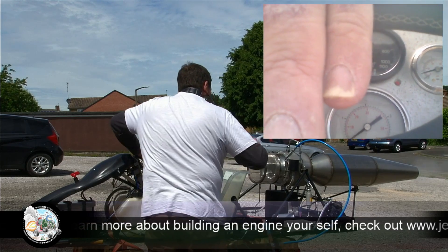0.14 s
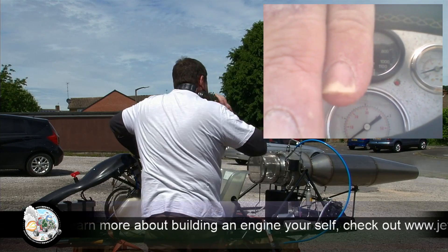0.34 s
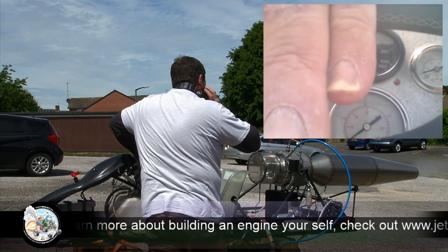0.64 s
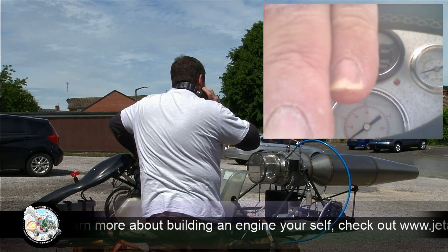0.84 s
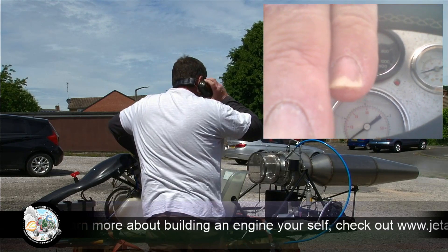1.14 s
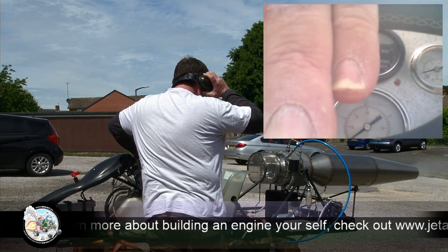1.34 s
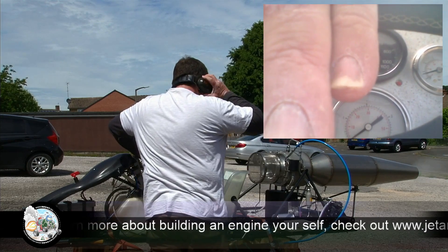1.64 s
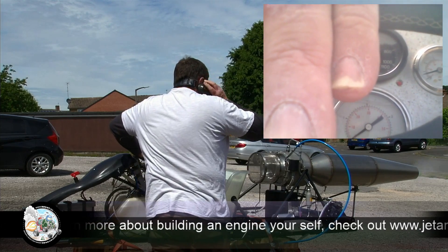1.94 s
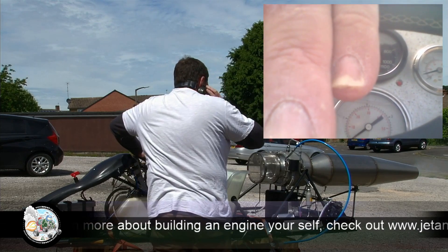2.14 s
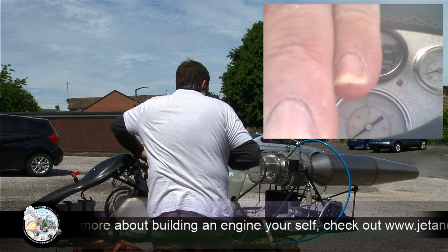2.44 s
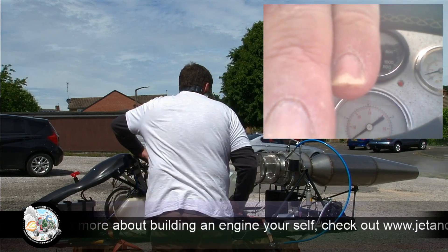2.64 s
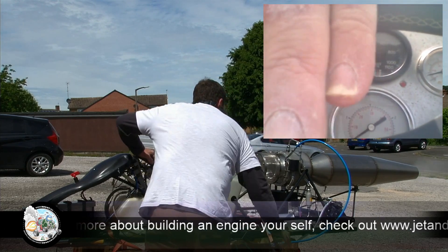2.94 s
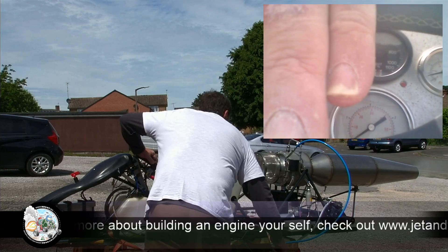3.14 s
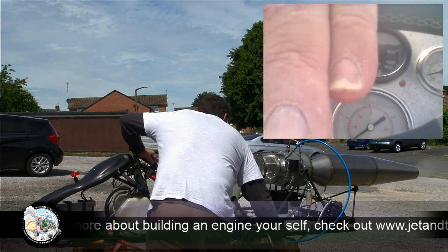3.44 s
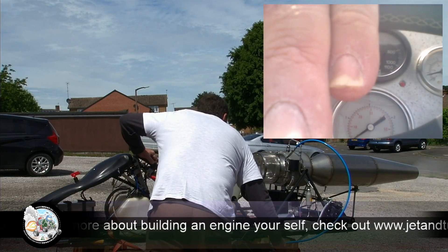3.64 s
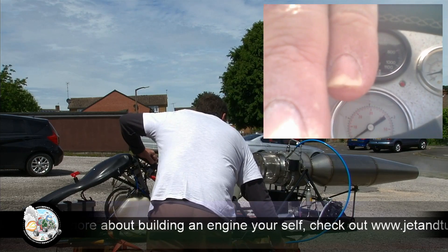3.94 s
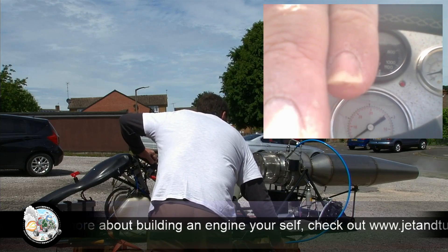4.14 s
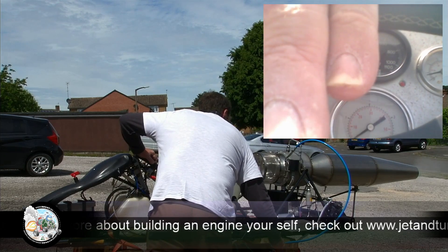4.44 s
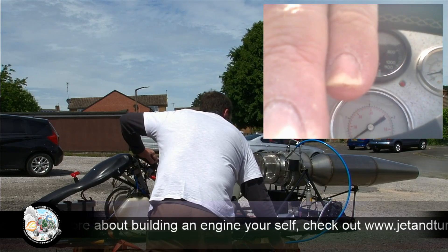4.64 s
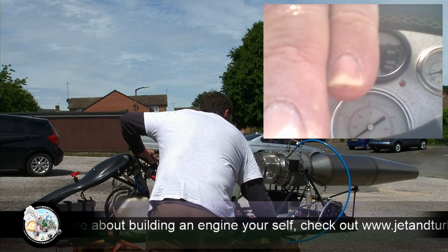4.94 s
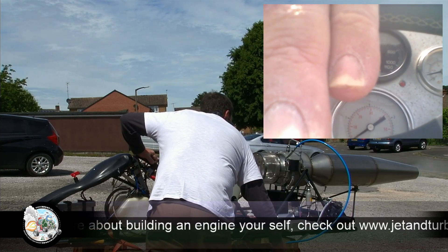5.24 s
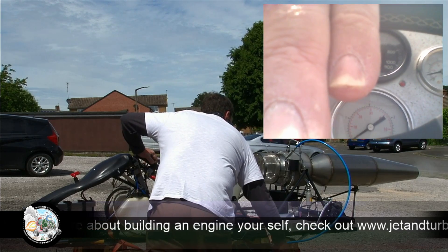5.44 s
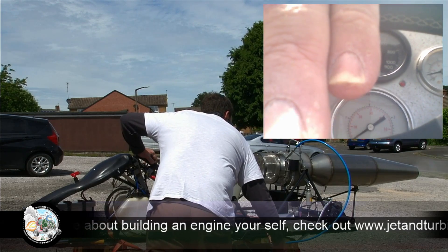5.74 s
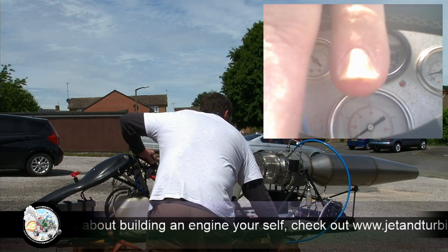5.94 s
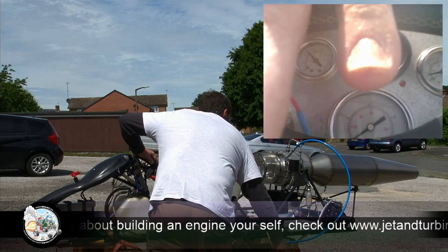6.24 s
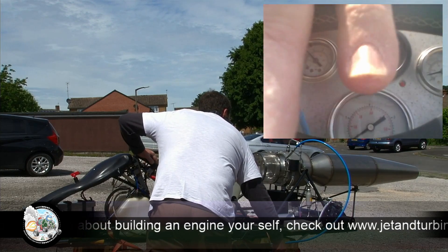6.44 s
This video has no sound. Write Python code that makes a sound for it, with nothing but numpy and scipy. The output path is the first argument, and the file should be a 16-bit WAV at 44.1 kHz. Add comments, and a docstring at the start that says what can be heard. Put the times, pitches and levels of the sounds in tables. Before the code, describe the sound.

In an open car park, a small gas turbine sings a loud, piercing whine that wavers and slowly sags, wrapped in duct roar and rushing air. Just after five seconds it dips quickly, the air is cut, and a thinner whine coasts down. Wind buffets the microphone softly; dry scuffs and a dull knock come close by near the end.

```python
"""A small gas turbine built from a turbocharger runs in an open car park, over gusty wind rumble and a far murmur.
Its blades whine in a stack of sine tones that sags slowly, over coloured noise for the roar and hiss of air.
After five seconds the drive is eased and the pitch drops; then the air is shut off, the hiss falls away
and the whine winds down under air drag. Near the end come dry noise-burst scuffs and a soft knock of two
decaying sines, close by."""
import sys
import numpy as np
from scipy import signal
from scipy.fft import rfft, irfft, next_fast_len
from scipy.io import wavfile
from scipy.ndimage import uniform_filter1d

SR = 44100
rng = np.random.default_rng(int(sys.argv[2]) if len(sys.argv) > 2 else 0)


def to_wav(s):
    """Save 16-bit WAV."""
    ch = np.atleast_2d(s).T  # columns
    pcm = np.round(np.clip(ch, -1, 1) * 32767)  # PCM
    wavfile.write(sys.argv[1], SR, pcm.astype(np.int16))


N = 291058   # length in samples

# Colour of the far murmur: (frequency [Hz], relative density [dB per Hz])
MURMUR_COLOUR = [(60, -14), (150, 2), (220, 1.5), (330, -14), (550, -8), (820, 4), (1100, -19), (1800, -10),
                 (3000, -25), (8000, -50)]
MURMUR_DB = -52.5

# Wind gusts: (time [s], lift [dB], width at half lift [s])
GUSTS = [(.3, 9.5, 0.35), (.6, 11.5, 0.3), (1.4, 9, 0.3), (2.15, 9.5, .2), (2.38, 10, 0.13), (2.8, 7, 0.23),
         (3.3, 11, 0.27), (3.58, 9, 0.089), (3.77, 12, 0.16), (4.2, 10, 0.54), (4.98, 13, .12),
         (5.7, 10.5, 0.59), (6.15, 3.5, .3)]
# Colour of the wind rumble: (frequency [Hz], relative density [dB per Hz])
WIND_COLOUR = [(12, -5.5), (25, 7.5), (50, -1), (80, -2), (130, -28), (250, -51)]
WIND_DB, WIND_SAG_DB_PER_S = -44, 1.55   # lull between gusts, at the start

# Dry scuffs: (time [s], level before the rise softens it [dB], rise time constant [s], decay by 60 dB [s])
SCUFFS = [(5.727, -41.5, .001, .07), (5.845, -48, .008, .2), (6.146, -56, .001, .03),
          (6.332, -51, .004, .18), (6.445, -47, .004, 0.15)]
# Colour of the scuffs: (frequency [Hz], relative density [dB per Hz])
SCUFF_COLOUR = [(3000, -22), (5500, 0), (8000, -3), (12000, -5), (15500, -13)]
# Ringing tones of the knock: (frequency [Hz], level before the rise softens it [dB], decay by 60 dB [s])
KNOCK_TONES = [(109.7, -37.5, .6), (268, -42, 0.54)]
KNOCK_S, KNOCK_RISE_S = 6.325, 0.0099   # start, rise time constant

# Air through the engine, one row each for combustor rumble, duct roar, intake rush and jet hiss:
# (starting level [dB], sag [dB/s], loss when eased [dB], loss when shut [dB], fading after the shut-off [dB/s])
AIR_LEVELS = [(-38, 1.0, 2, 2.5, 6), (-31, .5, 5.5, 0, 8), (-29.5, 1, 4, 2, 9), (-34.5, 0.36, 7.5, 20, 14)]
# Colours of the four airs: (frequency [Hz], relative density [dB per Hz])
RUMBLE_COLOUR = [(60, -7.5), (100, -1.5), (180, -3), (260, -3.5), (380, -4), (480, -17), (600, -54)]
ROAR_COLOUR = [(300, -35), (400, -7.5), (470, -6), (700, -9), (1100, -6.5), (1400, -9.5), (1700, -18.5),
               (2200, -50)]
RUSH_COLOUR = [(1100, -29), (1500, -8.5), (2000, -3.5), (2700, -5), (4000, -7.5), (5000, -11), (6200, -18),
               (7500, -23), (11000, -31), (16000, -52)]
HISS_COLOUR = [(3500, -17), (5000, 2), (6200, -3.5), (7500, 0.5), (9000, -1.5), (12000, -4), (15500, -10)]
# Duct resonances: (frequency [Hz], width at half lift [Hz], lift [dB])
DUCT_RESONANCES = [(131, 23, 8.5), (162.5, 12, 7.5), (221, 7.5, 2.5), (529, 124, 8), (798, 63, 7),
                   (997, 140, 5), (1288, 69, 6), (2140, 140, 3.5), (3530, 33, 5)]
# One swell of the rumble: (time [s], lift [dB], width at half lift [s])
RUMBLE_SWELL = (1.4, 3.5, 2.8)

# Rotor while driven: (time [s], blade passing rate [Hz])
DRIVEN_SPEED = [(0, 2579.4), (.4, 2573.7), (.8, 2560.3), (1.2, 2538.9), (2, 2489.4), (2.8, 2438.6),
                (3.2, 2411.7), (3.6, 2387.7), (4.2, 2352.6), (5, 2299.3), (5.08, 2284.8), (5.16, 2242.6),
                (5.24, 2183.1), (5.4, 2073.5), (5.48, 2018.0)]
# Air drag after the last driven point: the rate falls as (1 + age / COAST_S) ** -COAST_POWER
COAST_S, COAST_POWER = 3.856, 1.952
EASE_S, EASE_FALL_S, AIR_EASE_FALL_S = 5.06, 0.055, 0.13   # drive eased: start, time constants of tones and air
SHUT_S, SHUT_FALL_S = 5.475, 0.08   # air shut off: start, time constant

# The four lowest orders swell and fade as direct sound and echoes add or cancel:
# (time [s], rms level before losses, dropouts and flutter [dB])
FIRST_LEVEL = [(0, -15), (.3, -15), (.55, -19), (.68, -18), (.9, -19), (1.1, -14), (1.21, -14), (1.6, -11),
               (1.78, -11.5), (2.1, -9), (2.3, -10.5), (2.78, -10.5), (3.04, -16.5), (3.2, -14.5),
               (3.3, -14), (3.42, -11.5), (3.64, -16.5), (3.86, -17), (3.96, -16.5), (4.2, -17),
               (4.38, -21), (4.52, -28.5), (4.96, -22.5), (5.1, -16), (5.18, -22), (5.33, -23), (5.42, -25),
               (5.54, -24)]
SECOND_LEVEL = [(0, -20.5), (.4, -22), (.92, -15.5), (1.12, -20.5), (1.28, -19.4), (1.8, -27.7),
                (1.92, -23.5), (2.16, -34), (2.3, -37), (2.42, -28.5), (2.68, -29), (3.0, -19.5),
                (3.16, -24), (3.56, -19), (3.96, -24.5), (4.2, -21), (4.56, -18.5), (4.95, -28.5),
                (5.05, -24.5), (5.35, -21.5), (5.86, -23), (5.96, -27.5), (6.08, -23), (6.16, -27),
                (6.24, -25), (6.29, -17.5), (6.38, -23.5), (6.46, -29.5), (6.53, -38), (6.6, -33)]
THIRD_LEVEL = [(0.0, -36), (0.08, -37.0), (1.48, -27), (1.88, -35), (2.04, -32.3), (2.6, -39.5),
               (2.92, -30), (3.4, -38.5), (3.88, -27.5), (4.0, -36), (4.6, -31), (4.72, -39), (5.36, -30.5),
               (5.48, -39)]
FOURTH_LEVEL = [(0, -38), (.4, -39.5), (.76, -30.5), (1.3, -33.5), (1.55, -31.5), (1.85, -33.5),
                (2.3, -32.5), (2.75, -36.5), (2.92, -30.5), (3.92, -34.5), (4.08, -44), (4.5, -43),
                (4.84, -34.5), (5.05, -37.5), (5.3, -31), (5.45, -35.5), (6.08, -42.5), (6.2, -52),
                (6.45, -32), (6.6, -36)]
HIGH_ORDERS_DB = (-39, -40, -53)   # fifth, sixth and seventh, before the same changes and slow fading
# Faint tones from uneven blades: (time [s], rms level before losses, flutter and patchiness [dB])
FIVE_QUARTERS_LEVEL = [(0, -60), (.9, -42), (1.15, -38.5), (1.3, -70)]
ELEVEN_QUARTERS_LEVEL = [(0, -56), (2.7, -57), (2.92, -46), (3.1, -57), (3.5, -48), (3.75, -55),
                         (3.88, -49), (4.1, -60), (5.52, -58), (5.63, -45), (5.7, -58), (5.85, -53),
                         (6.1, -83)]
# Pitch of each tone: (multiple of the blade rate)
ORDERS = [1, 2, 3, 4, 5, 6, 7, 5 / 4, 11 / 4]
# Loss of each tone, negative for a lift: (loss when eased [dB], loss when shut [dB])
ORDER_LOSS = [(-1.5, 45), (0.5, 12), (1.5, 30), (0.5, 19), (7, 33), (6, 30), (4, 35), (1, -6), (0, -2)]
# Echoes cancel one order for a moment, most often while the pitch falls fast:
# (time [s], order, depth [dB], width at half depth [s])
DROPOUTS = [(.2, 6, 22, 0.22), (1.03, 5, 11, 0.15), (1.6, 5, 14, 0.25), (1.95, 6, 10, 0.48),
            (2.14, 2, 14, 0.027), (2.2, 5, 7, .15), (2.7, 2, 11, 0.048), (3.05, 6, 7, .3),
            (3.47, 6, 20, .06), (3.5, 5, 3, 0.25), (3.88, 2, 5, 0.042), (4.25, 3, 10, 0.064),
            (4.62, 6, 8, 0.18), (5.049, 3, 19, 0.011), (5.139, 1, 14, 0.029), (5.141, 3, 11, 0.0089),
            (5.206, 3, 21, .017), (5.211, 1, 8, .014), (5.213, 2, 14, 0.012), (5.287, 2, 11, .011),
            (5.322, 2, 10, 0.011), (5.29, 1, 5, 0.014), (5.332, 4, 9, 0.024), (5.396, 2, 12, 0.016),
            (5.396, 3, 19, .023), (5.456, 2, 13, 0.03), (5.5, 1, 15, 0.0099), (5.53, 2, 3, 0.023),
            (5.563, 2, 12, .01), (5.63, 2, 16, .01), (5.674, 2, 15, 0.052), (5.801, 2, 9, 0.017),
            (5.83, 4, 13, 0.021), (5.907, 2, 23, 0.014), (5.92, 4, 8, .02), (5.97, 2, 9, 0.016),
            (6.198, 2, 9, 0.011), (6.52, 4, 7.5, 0.018)]

# Stereo spread of all noise: (frequency [Hz], side level relative to mid [dB])
SIDE_SHARE = [(60, -64), (150, -26), (500, -32.5), (1200, -42), (2500, -52), (6000, -67), (9000, -20.5),
              (15000, -6)]
CUTOFF_HZ = 15750


def from_db(db):
    """Turn decibels into an amplitude factor."""
    return 10 ** (np.asarray(db) / 20)


def rms_one(x):
    """Scale to an rms of 1."""
    return x / np.sqrt(np.mean(x ** 2) + 1e-20)


def in_time(curve):
    """Draw straight lines between (time, value) points, one value per sample."""
    times, values = np.transpose(curve)
    return np.interp(np.arange(N) / SR, times, values)


def at_hz(points, hz):
    """Read a spectrum curve, straight over log frequency."""
    point_hz, point_db = np.transpose(points)
    return np.interp(np.log(hz), np.log(point_hz), point_db)


def step(start, fall):
    """Settle from 0 towards 1 with the time constant fall."""
    return 1 - np.exp(-np.maximum(np.arange(N) / SR - start, 0) / fall)


def bump(s, width):
    """Bell of height 1 around s, with the given width at half height."""
    return 1 / (1 + (2 * (np.arange(N) / SR - s) / width) ** 2)


def drift(rate_hz):
    """Slow chance: noise at every 20th sample through a double one-pole low-pass; rms 1."""
    pole = np.exp(-2 * np.pi * rate_hz * 20 / SR)
    noise = rng.standard_normal(N // 20 + 4002)
    slow = signal.lfilter([1], [1, -2 * pole, pole * pole], noise)[4000:]   # drop the filter's start
    return np.interp(np.arange(N) / 20, np.arange(len(slow)), rms_one(slow))


def coloured(spectrum, resonances=()):
    """Stereo noise of the given spectrum, its channels made from mid and side; rms 1."""
    size = next_fast_len(N)
    hz = np.maximum(np.arange(size // 2 + 1) * SR / size, 1)
    shape_db = at_hz(spectrum, hz)
    for centre_hz, width_hz, lift_db in resonances:
        shape_db = shape_db + lift_db / (1 + (2 * (hz - centre_hz) / width_hz) ** 2)
    mid, side = rfft(rng.standard_normal((2, size))) * from_db(shape_db)
    side = side * from_db(at_hz(SIDE_SHARE, hz))
    left_right = irfft(np.array([mid + side, mid - side]), size)[:, :N]
    return rms_one(left_right)


def murmur():
    """Far surroundings as one bed of coloured noise that wavers a little in level."""
    return from_db(MURMUR_DB + 1.7 * drift(2.5)) * coloured(MURMUR_COLOUR)


def wind(lumpy_db):
    """Low buffeting on the microphone: deep noise lifted by gusts, slightly lumpy, sagging slowly."""
    level_db = WIND_DB - WIND_SAG_DB_PER_S * np.arange(N) / SR
    for s, lift_db, width in GUSTS:
        level_db = level_db + lift_db * bump(s, width)
    return from_db(level_db + lumpy_db * drift(5.1)) * coloured(WIND_COLOUR)


def scuffs():
    """Dry scrapes close by: short bright noise bursts, roughened by fast level changes."""
    t, envelope = np.arange(N) / SR, np.zeros(N)
    for s, level_db, rise, t60 in SCUFFS:
        age = np.maximum(t - s, 0)
        envelope += from_db(level_db - 60 * age / t60) * (1 - np.exp(-age / rise))
    grit = from_db(1.5 * drift(150))
    return envelope * grit * coloured(SCUFF_COLOUR)


def knock():
    """A soft hollow knock: two low sines start together and die away exponentially."""
    age, ringing = np.maximum(np.arange(N) / SR - KNOCK_S, 0), np.zeros(N)
    for hz, level_db, t60 in KNOCK_TONES:
        ringing += from_db(level_db - 60 * age / t60) * np.sin(2 * np.pi * hz * age)
    return ringing * (1 - np.exp(-age / KNOCK_RISE_S))


def airflow(gust_db, patchy_db):
    """Turbulent air as rumble, roar, rush and hiss: shared slow gusts, each flickering on its own."""
    t, gust, out = np.arange(N) / SR, drift(0.7), 0
    eased, shut = step(EASE_S, AIR_EASE_FALL_S), step(SHUT_S, SHUT_FALL_S)
    since_shut = np.maximum(t - SHUT_S, 0)
    swell_s, swell_db, swell_width = RUMBLE_SWELL
    swells_db = (swell_db * bump(swell_s, swell_width), 0, 0, 0)   # only the rumble swells
    colours = (RUMBLE_COLOUR, ROAR_COLOUR, RUSH_COLOUR, HISS_COLOUR)
    for colour, lift_db, row in zip(colours, swells_db, AIR_LEVELS):
        start_db, sag_db, eased_db, shut_db, fading_db = row
        level_db = start_db + lift_db - sag_db * t
        level_db = level_db - eased_db * eased - shut_db * shut - fading_db * since_shut
        level_db = level_db + gust_db * gust + patchy_db * drift(8.3)
        out = out + from_db(level_db) * coloured(colour, DUCT_RESONANCES)
    return out


def blade_rate():
    """Blade passing rate in Hz: the driven curve, then a coast-down under air drag."""
    coasting = np.maximum(np.arange(N) / SR - DRIVEN_SPEED[-1][0], 0)
    return in_time(DRIVEN_SPEED) * (1 + coasting / COAST_S) ** -COAST_POWER


def blades(flutter_db, wander_rad, beating_db, fading_db, patchy_db):
    """One sine per multiple of the blade rate; turbulence shakes level and phase, more at higher orders."""
    rate_hz = blade_rate()
    turns = np.cumsum(rate_hz) / SR   # blade passages so far
    # a falling tone beats against its own late echoes: the steeper the fall, the stronger, full at 700 Hz/s
    fall_hz_per_s = uniform_filter1d(-np.gradient(rate_hz) * SR, size=4000)
    falling = np.clip(fall_hz_per_s / 700, 0, 1)
    low = [in_time(curve) for curve in (FIRST_LEVEL, SECOND_LEVEL, THIRD_LEVEL, FOURTH_LEVEL)]
    high = [db + fading_db * drift(2.8) for db in HIGH_ORDERS_DB]
    uneven = [in_time(curve) + patchy_db * drift(10.0)
              for curve in (FIVE_QUARTERS_LEVEL, ELEVEN_QUARTERS_LEVEL)]
    eased, shut = step(EASE_S, EASE_FALL_S), step(SHUT_S, SHUT_FALL_S)
    out = np.zeros(N)
    for order, level_db, (eased_db, shut_db) in zip(ORDERS, low + high + uneven, ORDER_LOSS):
        shake = np.sqrt(order)
        level_db = level_db - eased_db * eased - shut_db * shut
        for s, which, depth_db, width in DROPOUTS:
            if round(which) == order:
                level_db = level_db - depth_db * bump(s, width)
        flutter = shake * flutter_db * drift(15.6)
        beating = (order - 1) * beating_db * falling * drift(33)
        phase = 2 * np.pi * (order * turns + rng.random()) + wander_rad * shake * drift(21.0)
        out += np.sqrt(2) * from_db(level_db + flutter + beating) * np.sin(phase)   # sqrt(2): rms to peak
    return out


def scene():
    """Layer the far murmur, wind, small close noises, air and whine."""
    background = murmur() + wind(lumpy_db=0.2)
    close_by = scuffs() + knock()
    air = airflow(gust_db=0.53, patchy_db=0.49)
    whine = blades(flutter_db=0.72, wander_rad=0.083, beating_db=0.94, fading_db=2.0, patchy_db=3.0)
    return background + close_by + air + whine


def record(dry):
    """Cut the top steeply with an elliptic low-pass: 0.5 dB ripple, 70 dB rejection."""
    return signal.sosfilt(signal.ellip(12, .5, 70, CUTOFF_HZ, fs=SR, output="sos"), dry)


dry = scene()
out = record(dry)
to_wav(out)
```